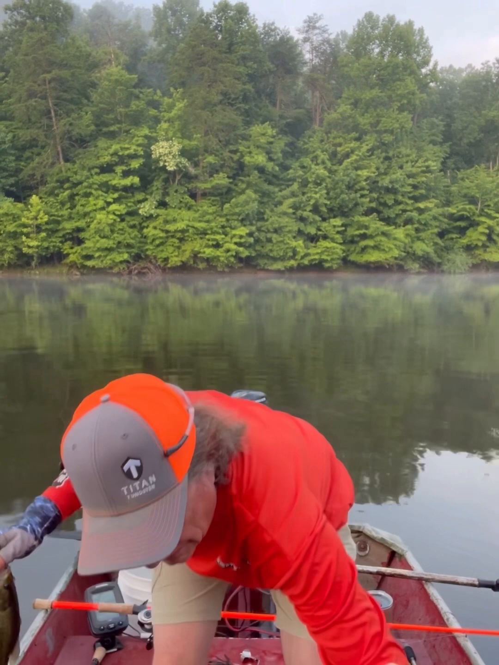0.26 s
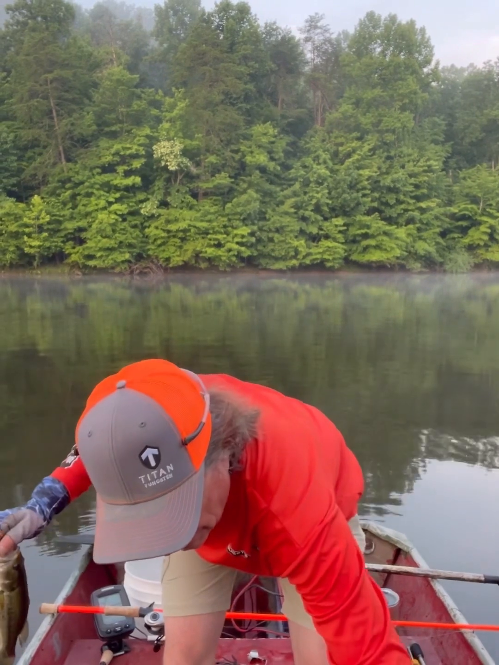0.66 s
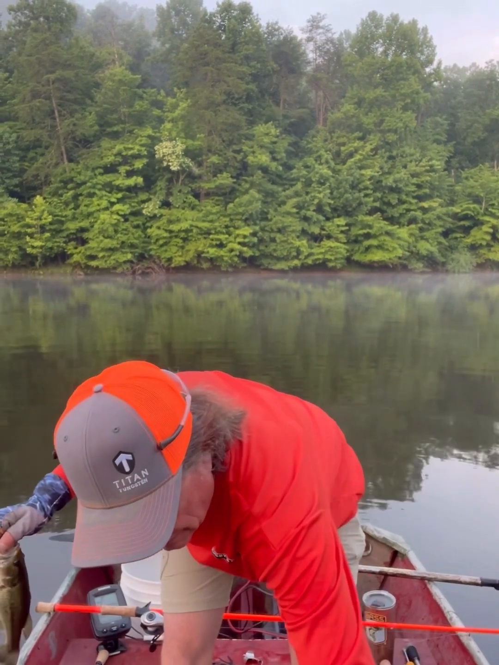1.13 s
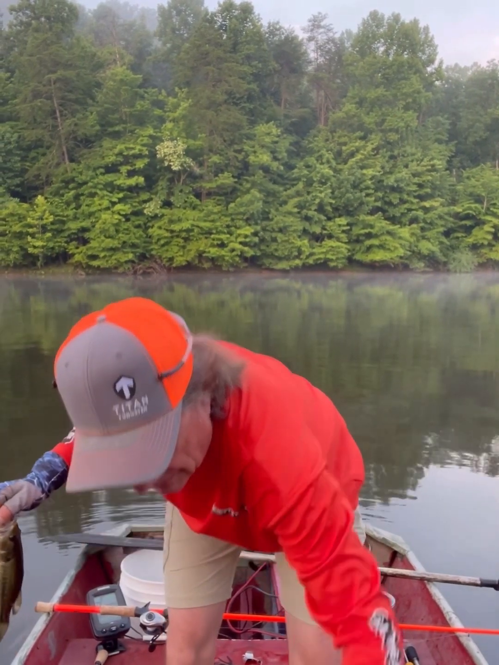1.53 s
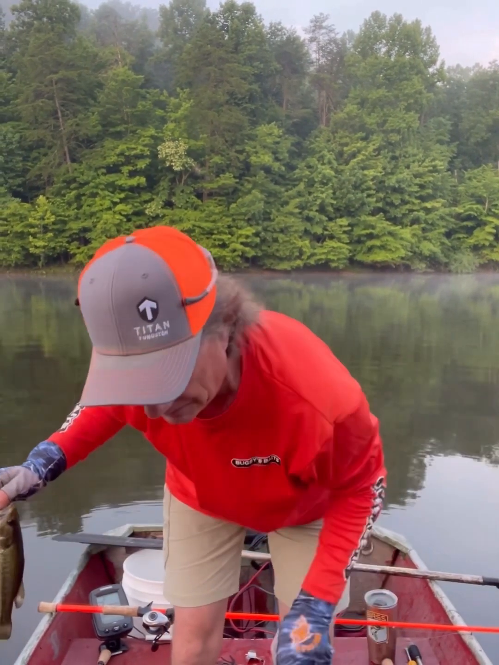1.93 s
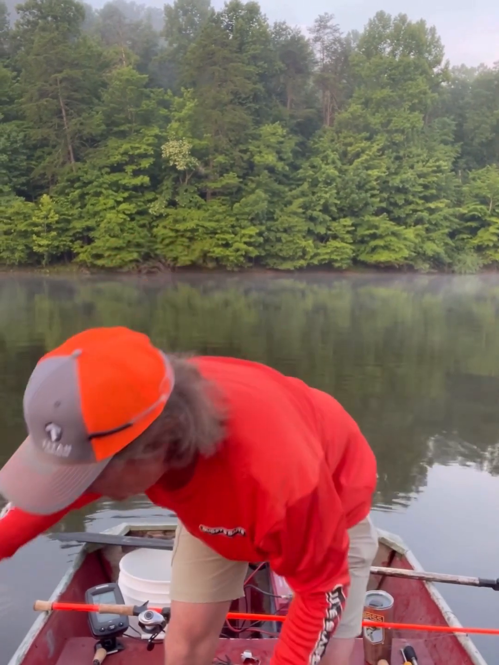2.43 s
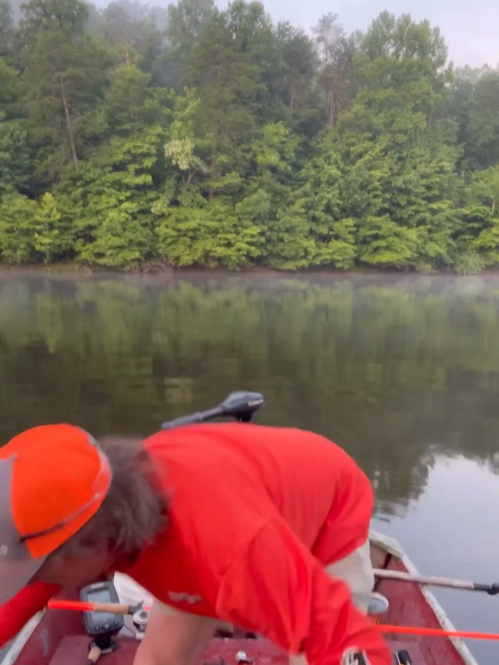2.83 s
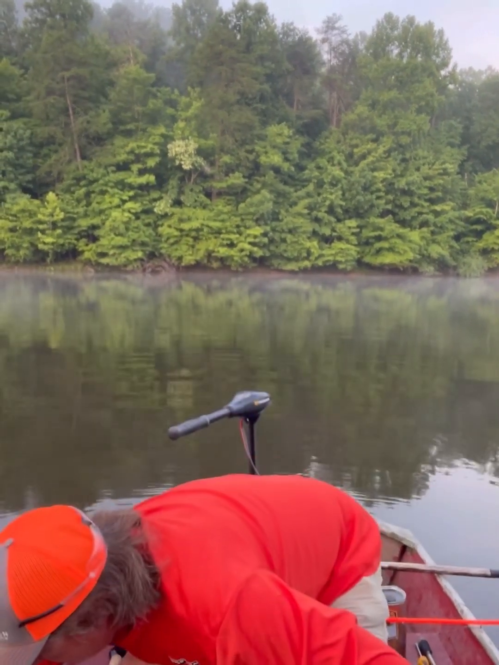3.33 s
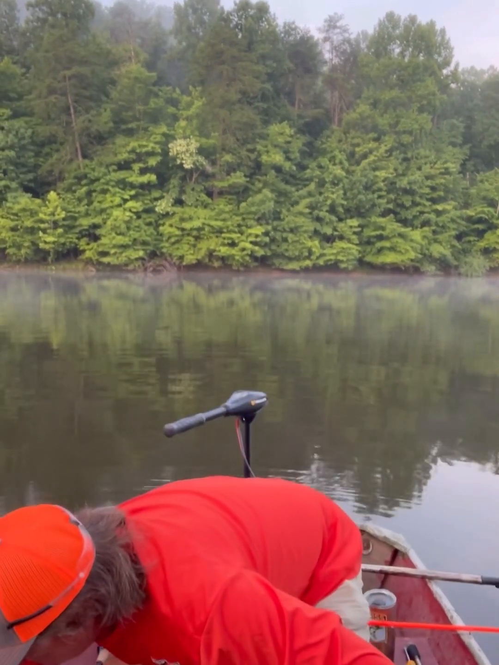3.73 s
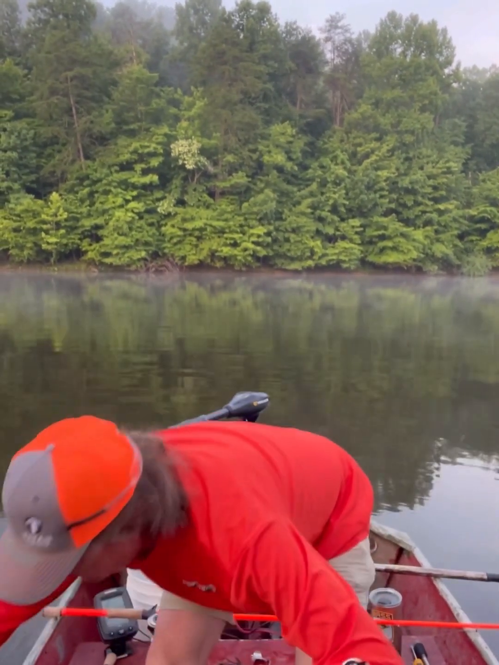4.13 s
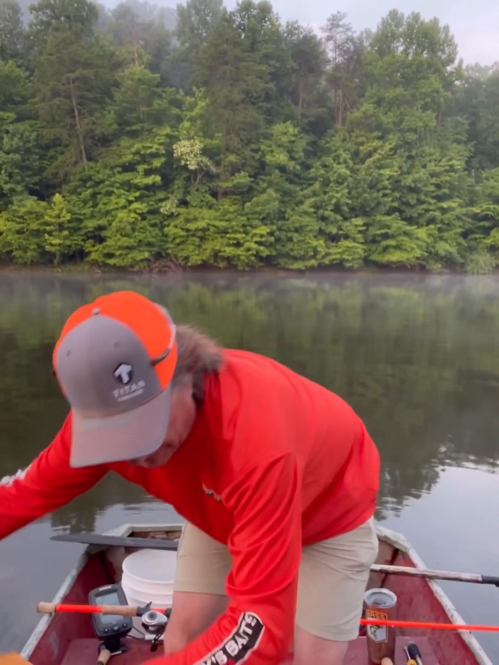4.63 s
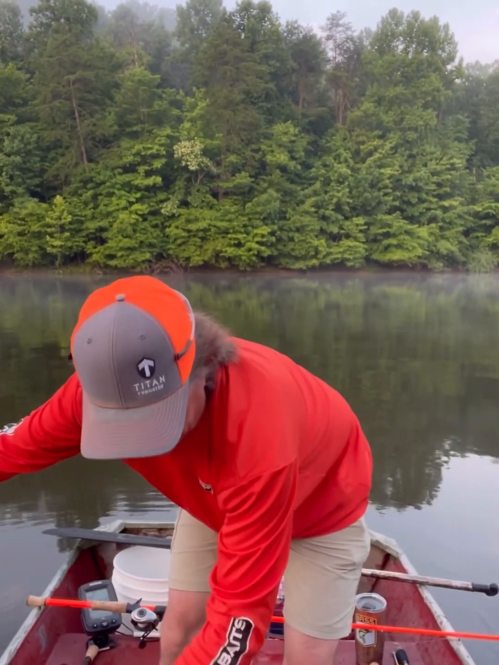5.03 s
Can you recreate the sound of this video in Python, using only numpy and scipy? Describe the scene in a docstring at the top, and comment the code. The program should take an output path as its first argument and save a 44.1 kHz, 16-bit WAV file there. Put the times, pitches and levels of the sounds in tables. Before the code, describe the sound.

Knocks and thumps on a small metal boat with a squeaky scrape, rustling sleeves and water plops, over faint birdsong and insects.

```python
"""In a small metal boat on a still lake, an angler moves about, a fish in one hand.
A sole scuffs and sleeves rustle; gear scrapes over the deck in stick-slip, squeaks, and knocks
the hull plates into ringing. The floor booms under shifting weight, and ripples plop against
the side as trapped air rings. From the wooded shore come a steady insect chorus and birdsong
scattered by the trees."""
import sys
import numpy as np
from scipy import signal
from scipy.fft import rfft, irfft
from scipy.io import wavfile
from scipy.ndimage import uniform_filter1d

SR = 44100
rng = np.random.default_rng(int(sys.argv[2]) if len(sys.argv) > 2 else 0)


def to_wav(s):
    """Save 16-bit WAV."""
    ch = np.atleast_2d(s).T  # columns
    pcm = np.round(np.clip(ch, -1, 1) * 32767)  # PCM
    wavfile.write(sys.argv[1], SR, pcm.astype(np.int16))


N = 232218
T = np.arange(N) / SR
SIDES = np.array([[1], [-1]])  # plus on the left, minus on the right


def undb(db):
    """Decibels to gain."""
    return 10 ** (np.asarray(db) / 20)


def unit(x):
    """Scale to rms 1."""
    return x / np.sqrt(np.mean(x ** 2) + 1e-20)


def add(out, s, x):
    """Mix x into out from time s."""
    i = max(int(s * SR), 0)
    out[:, i:i + x.shape[-1]] += x[..., :N - i]


def at_hz(hz, table, column=1):
    """Read a column of a table on a log-frequency axis."""
    table = np.array(table, float)
    return np.interp(np.log(hz + 1e-3), np.log(table[:, 0]), table[:, column])


def colour(x, spectrum, lo_hz=0, hi_hz=SR):
    """EQ x with a curve between two band edges; rms 1."""
    hz = np.fft.rfftfreq(x.shape[-1], 1 / SR)
    return unit(irfft(rfft(x) * undb(at_hz(hz, spectrum)) * (hz >= lo_hz) * (hz < hi_hz), x.shape[-1]))


def resonate(x, hz, width_hz):
    """One resonance, gain 1 at its centre."""
    return signal.lfilter(*signal.iirpeak(hz, hz / width_hz, SR), x)


def stereo_noise(size, spread):
    """White noise; spread is side over mid."""
    mid, side = rng.standard_normal((2, size))
    return unit(mid + spread * side * SIDES)


def wander(rate_hz):
    """Smooth random modulation, rms 1."""
    hold = int(SR / rate_hz)
    steps = np.repeat(rng.standard_normal(N // hold + 1), hold)
    return unit(uniform_filter1d(steps, hold)[:N])


def impulses(per_s):
    """Randomly timed triggers."""
    return rng.random(N) < per_s / SR


def fade(t, t60):
    """Exponential decay, 60 dB down after t60 seconds."""
    return np.exp(-np.log(1000) * np.maximum(t, 0) / t60)


def strokes(table, peak_at, fullness, release_s):
    """Envelope of slides: each speeds up, peaks at a share of its length, slows and dies away."""
    gain = 0
    for s, length, db in table:
        progress = np.interp(T, [s, s + peak_at * length, s + length], [0, .5, 1])
        speed = np.sin(np.pi * progress) * (T < s + length)
        gain = gain + undb(db) * speed.clip(0) ** (1 / fullness)
    pole = np.exp(-np.log(1000) / (release_s * SR))
    return signal.lfilter([1 - pole], [1, -pole], gain + 1e-12)


def whistle(length_s, start_hz, middle_hz, end_hz, waver):
    """A nearly pure note gliding through three pitches."""
    progress = np.linspace(0, 1, int(length_s * SR))
    glide = np.polyval(np.polyfit([0, .5, 1], [start_hz, middle_hz, end_hz], 2), progress)
    wobble = np.interp(progress, np.linspace(0, 1, 24), rng.standard_normal(24))
    hz = glide * (1 + waver * wobble)
    return np.sin(2 * np.pi * np.cumsum(hz) / SR) * np.sin(np.pi * progress).clip(0)


# EQ of the open air: (frequency [Hz], level [dB])
AIR_EQ = [(18, -26), (30, -16.5), (130, -1.5), (274, -6.5), (470, -8.5), (1190, -19.5), (1660, -21.5),
          (2770, -6.5), (3970, -10.5), (4630, -1.5), (5550, -19), (6470, -16.5), (7750, -32),
          (11400, -28.5), (14000, -63.5)]
def shore(air_db=-61.5, insect_hz=4650, insect_db=-60.5, far_birds_db=-72):
    """The ambience bed: open air, a narrow band of insects and the blur of far birds."""
    def band(hz, width_hz, spread):
        return unit(resonate(resonate(stereo_noise(N, spread), hz, width_hz), hz, width_hz))
    air = undb(air_db + wander(1)) * colour(stereo_noise(N, 1), AIR_EQ)
    insects = band(insect_hz, 440, spread=0.7) * undb(insect_db + 0.96 * wander(56))
    far_birds = sum(band(hz, 540, spread=1) * undb(3.8 * wander(4.6)) for hz in (2450, 2800, 3200))
    return air + insects + undb(far_birds_db) * unit(far_birds)


# Deck resonances under a shoe: (frequency [Hz], width [Hz], level [dB])
SOLE_MODES = [(163, 7.3, -0.5), (252.6, 13, -3), (450, 20, -4.5), (560, 87, -3.5), (788, 8.5, 6.5),
              (1970, 710, -21.5)]
# Scuffs of the sole: (time [s], length [s], level [dB])
SCUFFS = [(0.0, 0.045, -41), (0.085, 0.045, -49.5), (1.24, 0.037, -47.5), (1.285, .12, -49.5),
          (1.395, 0.1, -44.5), (3.825, 0.12, -63), (4.065, 0.077, -69.5), (4.19, 0.15, -69.5)]
def sole(slips_per_s=70, pan_db=-4, lowpass_hz=5000, rasp_db=3):
    """Uneven slips of a shoe ring the deck."""
    slips = impulses(slips_per_s) * rng.uniform(0.86, 1, N)
    drive = unit(slips) + 1.4 * stereo_noise(N, 0.69)
    deck = unit(sum(undb(db) * resonate(drive, hz, width) for hz, width, db in SOLE_MODES))
    dulled = signal.sosfilt(signal.butter(1, lowpass_hz, fs=SR, output="sos"), deck)
    envelope = strokes(SCUFFS, peak_at=0.067, fullness=3.2, release_s=0.094)
    return dulled * envelope * undb(4.5 + rasp_db * wander(60) + SIDES * pan_db / 2)


# EQ of rubbing cloth: (frequency [Hz], level [dB])
CLOTH_EQ = [(180, -62.5), (300, -7.5), (358, -2), (1070, -4.5), (1430, -10.5), (2430, -3.5), (3190, -9.5),
            (8640, -12), (11500, -17), (13000, -13.5), (14000, -66)]
# Arm moves that rub the sleeves: (time [s], length [s], level [dB])
ARM_MOVES = [(0.0, 0.089, -58.5), (0.087, 0.044, -58), (0.61, 0.32, -65.5), (0.96, .1, -64),
             (1.09, 0.24, -66), (1.2, 0.033, -78), (1.34, 0.16, -71.5), (1.86, 0.21, -66), (2.05, 0.6, -73),
             (2.43, 0.4, -73), (2.735, 0.22, -65), (3.0, 0.21, -72), (3.82, 0.18, -68.5),
             (4.055, 0.39, -70.5), (4.41, 0.039, -66)]
def sleeves(catches_per_s=170, creases_per_s=22):
    """Cloth slides with a hiss; its fibres catch and let go, and creases snap."""
    catches = impulses(catches_per_s) * undb(1.6 * rng.exponential(size=N).clip(0, 4))
    creases = impulses(creases_per_s) * rng.uniform(.3, 1, N)
    cloth = colour(stereo_noise(N, .25) + .5 * unit(catches) + .5 * unit(creases), CLOTH_EQ)
    envelope = strokes(ARM_MOVES, peak_at=0.2, fullness=1.2, release_s=0.1)
    return cloth * envelope * undb(10.5 + 2 * wander(30) + 2 * wander(220))


# Squeaks: (time [s], length [s], start pitch [Hz], middle pitch [Hz], end pitch [Hz], level [dB])
SQUEAKS = [(0.131, 0.033, 2995, 2820, 2680, -31.5), (0.256, 0.077, 3300, 3305, 3366, -34.5),
           (0.328, 0.1, 3310, 3303, 3310, -36.5), (0.394, 0.13, 3300, 3324, 3250, -48.5),
           (4.417, 0.039, 2120, 2190, 2290, -53)]
def gear_squeaks(stereo_phase_rad=0.95):
    """Stick-slip of the gear locks into a tone."""
    out = np.zeros((2, N))
    for s, length, start, middle, end, db in SQUEAKS:
        squeak = signal.hilbert(whistle(length, start, middle, end, waver=0.0027))
        add(out, s, undb(db) * np.real(squeak * np.exp(.5j * stereo_phase_rad * SIDES)))
    return out


def bending_attack(t, hz):
    """Bending waves are slower when low: the boom arrives after the crack."""
    slowness = np.sqrt(150 / hz)
    delay_s = 0.003 * (slowness - np.sqrt(150 / 14000))
    return np.clip((t - delay_s) / (0.0055 * slowness), 0, 1)


# EQ of the crowded small plate modes: (frequency [Hz], level [dB])
WASH_EQ = [(29, -34), (50, -10.5), (330, -9), (504, -7), (847, -10), (1070, -15.5), (1720, -30.5),
           (1930, -22.5), (2950, -24), (3250, -29), (6580, -32), (7770, -32.5), (10300, -34),
           (13000, -31.5), (14000, -66)]
# Their decay at ring = 1: (frequency [Hz], early t60 [s], tail t60 [s])
WASH_DECAY = [(80, 0.29, .9), (240, 0.082, 0.53), (700, 0.14, 0.39), (2500, 0.062, 0.35),
              (10000, 0.051, 0.11)]
def plate_wash(t, lo_hz, hi_hz, ring, spread, tail_db=-19.5):
    """Crowded plate modes blur into noise that drops fast, then leaves a quiet tail."""
    noise, wash = stereo_noise(len(t), spread), 0
    edges = np.geomspace(lo_hz, hi_hz, 4)
    for low, high in zip(edges, edges[1:]):
        hz = np.sqrt(low * high)
        early_t60, tail_t60 = (at_hz(hz, WASH_DECAY, column) * ring for column in (1, 2))
        band = colour(noise, WASH_EQ, low, high) * undb(at_hz(hz, WASH_EQ)) * np.sqrt(high - low)
        decay = fade(t, early_t60) + undb(tail_db) * fade(t, tail_t60)
        wash = wash + band * bending_attack(t, hz) * decay
    return wash


# Registers of the hull, boom to crack: (low edge [Hz], high edge [Hz])
REGISTERS = [(50, 200), (200, 450), (450, 1300), (1300, 4300), (4300, 14000)]
# Main plate modes at ring = 1: (frequency [Hz], level [dB], t60 [s])
HULL_MODES = [(74.5, -15, 0.47), (93.6, -11.5, 0.95), (122.7, -4, 0.32), (146.3, -1, .36), (175.3, 3, 0.21),
              (246.2, -3.5, 0.39), (282, -5, 0.33), (309.5, 4, 0.22), (334.3, -4.5, .25), (388, -5.5, 0.35),
              (453, -17.5, .2), (529, -6.5, 0.18), (606, -8.5, 0.31), (668, -6.5, 0.23), (846, 0, 0.12),
              (882, -10, 0.21), (952, -11.5, 0.15), (1134, -12.5, 0.17), (1580, -20, 0.36),
              (1992, -3.5, 0.08), (2159, -0.5, 0.08), (2330, -4.5, 0.11), (2720, -2.5, 0.05),
              (2790, 0.5, 0.05), (2900, 3, 0.079), (3615, -8.5, 0.055), (6270, -4, 0.031), (6700, 3, 0.05),
              (7540, -6.5, .05), (8350, -1, 0.023), (9750, -4, 0.032)]
def knock(levels_db, ring, wash_db=-2, scatter_db=2.5):
    """One hit rings the main plate modes over the wash, each register at its own level."""
    t = np.arange(2 ** 15) / SR
    out, onset = 0, t < .03
    for (lo, hi), db in zip(REGISTERS, levels_db):
        # long waves and the direct crack reach both ears alike
        width = min((lo / 450) ** 2 + .1, 1, 1200 / lo)
        wash = plate_wash(t, lo, hi, ring, spread=0.73 * width)
        register = wash * undb(wash_db) / np.std(wash[:, onset])
        scatter = rng.standard_normal((len(HULL_MODES), 2))
        for k, ((hz, mode_db, t60), (strength, skew)) in enumerate(zip(HULL_MODES, scatter)):
            if lo <= hz < hi:
                phase = 2 * np.pi * hz * t + 0.94 * width * skew * SIDES
                gain = (-1) ** k * undb(mode_db + scatter_db * strength)
                register += gain * np.sin(phase) * bending_attack(t, hz) * fade(t, t60 * ring)
        out = out + undb(db) * register / np.std(register[:, onset])
    return out


def snap(attack_s=0.00095):
    """The instant of contact: a few milliseconds of hard crack."""
    t = np.arange(2 ** 11) / SR
    eq = [(800, -28), (1750, -20), (2000, -2.5), (3000, -5.5), (3400, -9), (6800, -16),
          (12000, -27.5), (14000, -30.5)]
    return colour(stereo_noise(len(t), 0.35), eq) * t / attack_s * np.exp(1 - t / attack_s)


# How a hit drives each register: (trim [dB], share of weight [0-1], share of hardness [0-1])
REGISTER_DRIVE = [(-0.5, 0.97, 0.15), (-0.5, 0.6, 0.02), (-0.5, 0.1, 0.02), (0, 0.06, 0.36), (-2, 0.09, 1)]
# Hits on the hull: (time [s], level [dB], weight [dB], hardness [dB], ring length [factor])
KNOCKS = [(0.139, -39, -15, -33, 0.94), (0.37, -48, 2, -41, 5.6), (0.557, -30.5, 5.5, 1, 1.02),
          (0.575, -40, 12, -8, 1.2), (0.735, -29.5, -3.5, -28, 1.6), (0.747, -27, -27, -27.5, 0.88),
          (1.291, -40.5, -24, -48, 0.34), (1.672, -20.5, 4, -4.5, 0.79), (1.9251, -17, -4.5, -4.5, 0.87),
          (1.972, -32.5, -2.5, -25, 1.22), (2.281, -55.5, -10.5, -14, 0.31), (2.782, -50, -20, -5, 0.47),
          (2.997, -54.5, 3, -40, 1.27), (3.142, -50.5, -8, -27.5, 1.34), (3.589, -47, 1, -61, 1.63),
          (4.549, -52, -25.5, 2, 1.3), (4.835, -60.5, -1, -12, 1), (5.178, -67, -3.5, 25.5, 1.5)]
def hull_knocks(low_cut_hz=85, snap_db=5):
    """Gear hits the hull: weight adds boom, hardness adds crack; small plates radiate no deep bass."""
    out = np.zeros((2, N))
    for s, db, weight_db, hardness_db, ring in KNOCKS:
        levels_db = [db + trim + heavy * weight_db + hard * hardness_db
                     for trim, heavy, hard in REGISTER_DRIVE]
        add(out, s, knock(levels_db, ring))
        add(out, s, undb(levels_db[3] + snap_db) * snap())  # follows the upper mids
    return signal.sosfilt(signal.butter(4, low_cut_hz, "high", fs=SR, output="sos"), out)


# Resonances of gear on the deck: (frequency [Hz], width [Hz], level [dB])
SCRAPE_MODES = [(450, 1770, 0.5), (875, 340, 9), (1582, 57, 8.5), (2296, 103, 9.5), (3270, 150, 3.5),
                (3970, 68, 1.5), (4720, 110, 3), (6100, 190, 0), (6840, 2100, -10.5), (8030, 320, -5.5),
                (8880, 290, -6), (12220, 410, -13.5)]
def gear_scrape(start_s=0.142, length_s=0.49, level_db=-41, slowing_db_per_s=24.5, catches_per_s=1500):
    """Fine stick-slip rings the dragged gear and the deck, fading as the gear slows."""
    catches = impulses(catches_per_s) * undb(2.9 * rng.exponential(size=N).clip(0, 4))
    drive = stereo_noise(N, 0.26) + 0.58 * unit(catches)
    scrape = unit(sum((-1) ** k * undb(db) * resonate(drive, hz, width)
                      for k, (hz, width, db) in enumerate(SCRAPE_MODES)))
    since = T - start_s
    return scrape * (since > 0) * undb(level_db - slowing_db_per_s * since) * fade(since - length_s, 0.3)


# EQ of the floor's boom: (frequency [Hz], level [dB])
FLOOR_EQ = [(40, -20), (60, 0), (85, 2.5), (140, 3), (220, -7), (450, -13), (900, -44)]
# Shifts of weight: (time [s], length [s], level [dB])
WEIGHT_SHIFTS = [(0.15, 0.068, -49.5), (0.37, 0.54, -56.5), (0.8, 0.074, -37.5), (0.9, 0.34, -47),
                 (1.28, 0.27, -47.5), (2.3, 0.57, -59), (2.79, 0.17, -47.5), (3.14, .12, -49),
                 (3.46, 0.093, -58.5), (3.6, .15, -58.5), (3.85, .2, -52), (4.19, .11, -49),
                 (4.56, 0.26, -60.5), (4.97, 0.089, -50), (5.18, 0.041, -49)]
def floor_boom(trim_db=-2.5):
    """The floor booms under shifting weight."""
    envelope = strokes(WEIGHT_SHIFTS, peak_at=0.13, fullness=1.53, release_s=0.105)
    return undb(trim_db) * colour(stereo_noise(N, 0.034), FLOOR_EQ) * envelope


def warbler(chip_period_s=.14, note_s=.026, slur_period_s=.128):
    """Eight evenly paced high-low chips, then three steep downward slurs."""
    song = np.zeros((2, N))
    for s in 0.528 + chip_period_s * np.arange(8):
        add(song, s, undb(-46.5) * whistle(note_s, 5700, 7130, 7600, waver=0.037))
        add(song, s + note_s, undb(-41) * whistle(note_s, 4210, 4590, 4000, waver=0.11))
    for s in 1.591 + slur_period_s * np.arange(3):
        add(song, s, undb(-50.5) * whistle(0.082, 7740, 5970, 4430, waver=0.029))
    return song


# Single calls: (time [s], length [s], pitch [Hz], opening bend [share of pitch], level [dB])
BIRD_CALLS = [(0.859, 0.074, 4483, 0.029, -49), (1.047, 0.093, 5754, .04, -52.5),
              (1.193, 0.045, 4470, -0.052, -48.5), (1.27, 0.039, 4430, 0.11, -54),
              (1.687, 0.043, 6470, -0.075, -44), (1.997, 0.045, 5490, 0, -51.5),
              (2.093, .09, 6630, 0.17, -51), (2.217, 0.054, 2920, -0.0646, -53),
              (3.27, 0.18, 6530, 0, -63.5), (4.408, 0.15, 3145, 0.056, -58),
              (4.9, 0.39, 4090, 0.061, -65.5)]
def bird_calls():
    """Lone whistles that settle onto a held pitch."""
    song = np.zeros((2, N))
    for s, length, hz, bend, db in BIRD_CALLS:
        note = whistle(length, hz * (1 + bend), hz * (1 + 0.084 * bend), hz, waver=0.0029)
        add(song, s, undb(db) * note)
    return song


def trill(start_s=1.6, notes_per_s=72, level_db=-52):
    """A bird's quick buzz of tiny rising notes."""
    song = np.zeros((2, N))
    for s in start_s + np.arange(24) / notes_per_s:
        add(song, s, undb(level_db) * whistle(.011, 2200, 2500, 2850, waver=.008))
    return song


def far_warble(start_s=2.4, step_s=.066, level_db=-59):
    """A distant bird runs through loosely timed notes of random pitch."""
    song = np.zeros((2, N))
    for k, (late, pitch, middle, end) in enumerate(rng.random((40, 4))):
        hz = 2500 + 1000 * pitch
        note = whistle(.07, hz, hz * (.85 + .25 * middle), hz * (.75 + .3 * end), waver=.025)
        add(song, start_s + step_s * (k + late), undb(level_db) * note)
    return song


# Note pairs of a see-saw song: (time [s], base pitch [Hz], level [dB])
SEESAW_PAIRS = [(2.62, 6570, -59), (2.95, 6290, -56), (3.26, 6085, -54.5), (3.605, 5670, -54),
                (3.94, 5270, -53.5)]
def seesaw(note_s=0.11, answer_after_s=0.15):
    """Each rising note is answered by a lower falling one; the song sinks as it goes."""
    song = np.zeros((2, N))
    for s, hz, db in SEESAW_PAIRS:
        rise = whistle(note_s, .91 * hz, .98 * hz, 1.02 * hz, waver=0.0144)
        answer = whistle(note_s, .86 * hz, .87 * hz, .62 * hz, waver=0.0283)
        add(song, s, undb(db) * rise)
        add(song, s + answer_after_s, undb(db - 1.5) * answer)
    return song


def through_trees(song, wood_t60=0.87, wet_db=-2, direct_db=-6):
    """Trees scatter the songs into a reverb: near branches first, then the wood."""
    t = np.arange(SR) / SR
    echoes = rng.standard_normal((2, SR)) * (2 * fade(t, 0.1) + fade(t, wood_t60))
    echoes /= np.sqrt(np.sum(echoes ** 2, axis=1, keepdims=True))
    return undb(direct_db) * song + undb(wet_db) * signal.fftconvolve(song, echoes, axes=1)[:, :N]


# Handling ticks: (time [s], level [dB])
TICKS = [(2.752, -53), (3.045, -62), (4.411, -55), (4.98, -64), (5.045, -59)]
def ticks(t60=0.053):
    """Tiny hard contacts: a bright click with no boom."""
    out, t = np.zeros((2, N)), np.arange(2 ** 12) / SR
    eq = [(1500, -57.5), (6000, 3), (9000, 3), (14000, -7.5)]
    for s, db in TICKS:
        add(out, s, undb(db) * colour(stereo_noise(len(t), 0.48), eq) * fade(t, t60))
    return out


# Plops against the side: (time [s], start pitch [Hz], attack [s], level [dB])
PLOPS = [(2.985, 411, 0.01, -46.5), (3.283, 1313, 0.0049, -60), (3.405, 1274, 0.007, -65.5),
         (3.449, 420, 0.0029, -58.5), (3.588, 452.5, 0.017, -44), (4.549, 509, 0.0071, -38.5),
         (4.66, 688, 0.0019, -47), (4.809, 506, 0.0018, -46), (4.917, 450, .004, -55.5),
         (4.975, 848, 0.0032, -62), (5.165, 720, 0.0049, -48)]
def water(glide=1.63, splash_db=-6, pan_db=-3, hollow_db=-15, hollow_t60=0.14):
    """Ripples trap air under the hull; the pockets ring and rise, and the hollow boat prolongs them."""
    out, t = np.zeros((2, N)), np.arange(2 ** 12) / SR
    for s, hz, attack, db in PLOPS:
        pocket = np.sin(2 * np.pi * hz * t * (1 + glide * t))
        eq = [(hz / 2, -12), (hz, 0), (hz * 1.44, -5), (hz * 4, -22), (hz * 15, -45)]
        splash = colour(stereo_noise(len(t), 0.31), eq)
        envelope = (t / attack) ** 2 * np.exp(2 - 2 * t / attack)
        plop = (pocket + undb(splash_db) * splash) * envelope
        hollow = undb(hollow_db) * splash * fade(t, hollow_t60)
        add(out, s, undb(db) * (plop + hollow))
    return out * undb(SIDES * pan_db / 2)


def scene():
    """The boat close by, the shore far off."""
    boat = hull_knocks() + floor_boom() + sole() + gear_scrape() + gear_squeaks()
    boat += sleeves() + ticks() + water()
    birds = warbler() + seesaw() + bird_calls() + trill() + far_warble()
    return boat + through_trees(birds) + shore()


# Stereo image of the microphone ports: (frequency [Hz], left phase lead [rad], left over right [dB])
MIC_PORTS = [(30, 0, 0), (150, 0, -1), (550, 0, -3.5), (1100, 0, 0), (2300, 0, 2), (4500, 0, 0),
             (7000, .15, 0), (10000, 1.4, 0), (12000, 2.5, 0), (14000, 3, 0)]
def record(dry, high_cut_hz=14300):
    """Two microphone ports differ in level and treble phase; peaks are rounded and the top is cut."""
    hz = np.fft.rfftfreq(N, 1 / SR)
    phase, tilt_db = (at_hz(hz, MIC_PORTS, column) * SIDES / 2 for column in (1, 2))
    ported = irfft(rfft(dry) * np.exp(1j * phase) * undb(tilt_db), N)
    high_cut = signal.ellip(8, .2, 70, high_cut_hz, fs=SR, output="sos")
    return signal.sosfilt(high_cut, np.tanh(ported))


dry = scene()
out = record(dry)
to_wav(out)
```